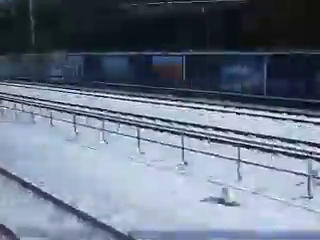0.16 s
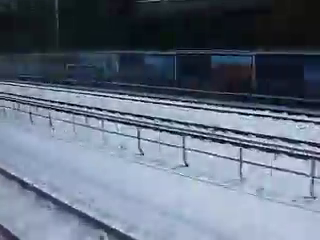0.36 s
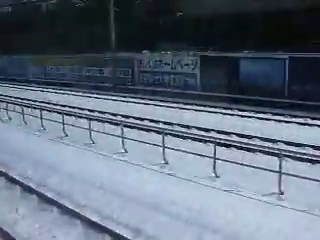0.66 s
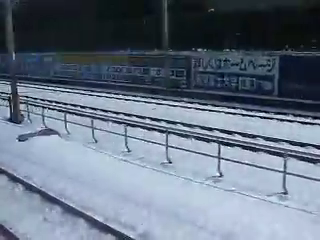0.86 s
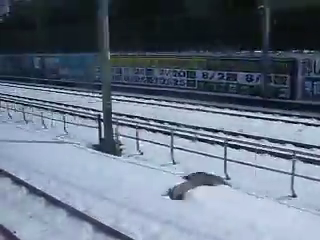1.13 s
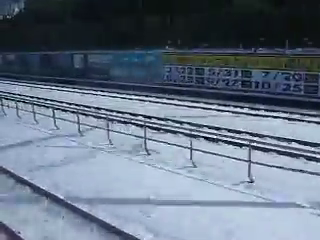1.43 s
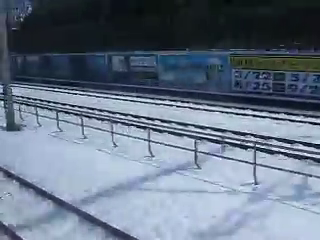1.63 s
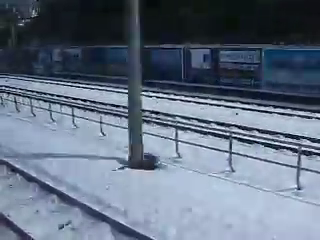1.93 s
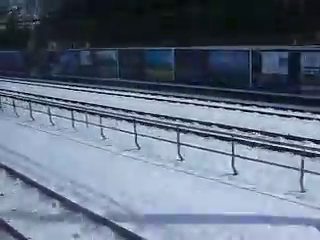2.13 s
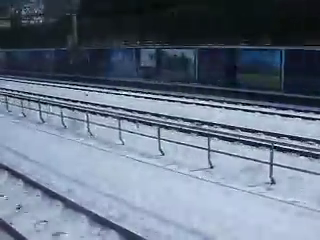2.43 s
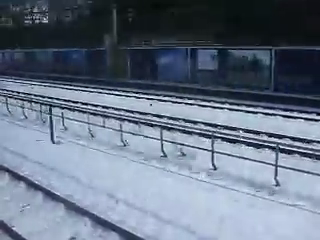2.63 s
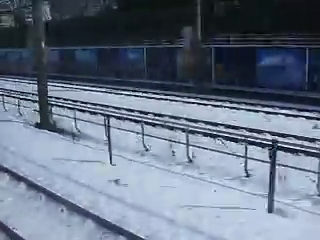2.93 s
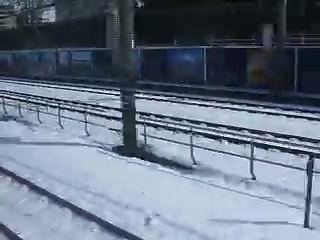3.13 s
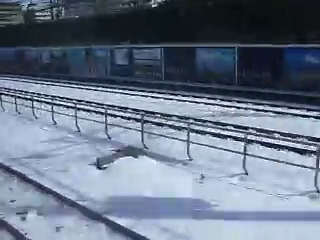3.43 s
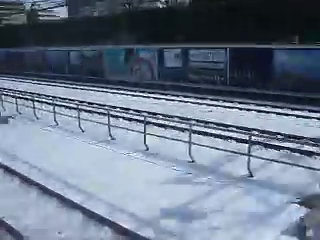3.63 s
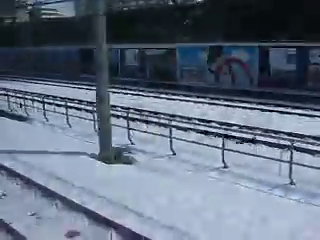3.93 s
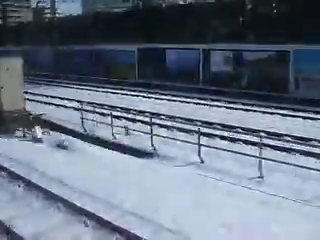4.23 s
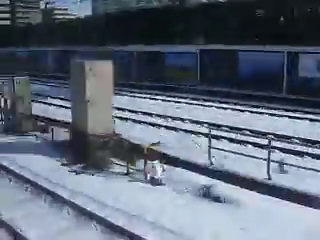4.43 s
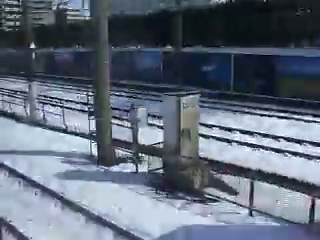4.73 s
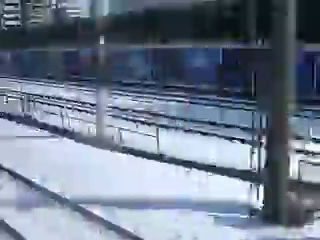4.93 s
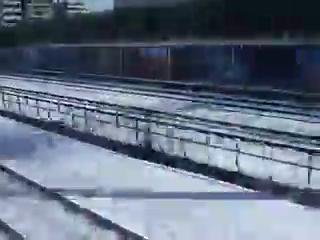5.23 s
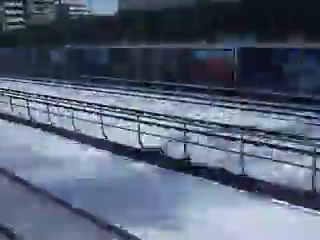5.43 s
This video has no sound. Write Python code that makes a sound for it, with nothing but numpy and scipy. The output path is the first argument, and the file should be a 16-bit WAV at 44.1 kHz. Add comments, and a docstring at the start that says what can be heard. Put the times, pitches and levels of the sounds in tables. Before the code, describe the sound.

Inside a moving electric train carriage, held motor tones hum over a muffled roar of wheels and a low floor rumble.

```python
"""Inside the carriage of an electric commuter train on open track.
The traction motor hums on multiples of its slowly rising shaft speed. The wheels roar on the rails,
the floor rumbles and the body panels drone, with extra shake over rough stretches of track.
Air hisses past the windows. A small narrow-band microphone just overloads and crackles faintly."""
import sys
import numpy as np
from scipy import signal
from scipy.fft import rfft, irfft
from scipy.io import wavfile
from scipy.ndimage import uniform_filter1d

SR = 44100
rng = np.random.default_rng(int(sys.argv[2]) if len(sys.argv) > 2 else 0)


def wrap_up_sound(samples):
    """Save the sound to the file named by the first command line argument, as 16-bit audio."""
    columns = np.atleast_2d(samples).T
    # keep every value between -1 and 1, then stretch to whole-number steps
    tamed = np.clip(columns, -1, 1)
    steps = np.round(tamed * 32767).astype(np.int16)
    wavfile.write(sys.argv[1], SR, steps)


N = 245195
TIME_S, FREQ_HZ = np.arange(N) / SR, np.fft.rfftfreq(N, 1 / SR)

# rough stretches that shake the carriage: middle_s, length_s, rumble_lift_db, drone_lift_db
ROUGH_TRACK = [(0.13, 0.15, 4, 0), (1.08, 0.18, 1.5, 2), (2.92, 0.24, 4.5, 0.5), (4.026, 0.13, 5, 4),
               (5.15, 0.62, 3.5, 4)]


def motor_hum():
    """The traction motor sings on whole multiples of its shaft speed: five loud tones over a faint bed."""
    # shaft speed: time_s, turns_per_s
    shaft_speed = [(0, 53.12), (2, 53.28), (4, 53.46), (4.4, 53.42), (5.56, 53.58)]
    # tones that sing out: multiple, resting_level_db
    loud_tones = [(4, -21.5), (7, -21.7), (11, -27.5), (19, -26), (23, -28.5)]
    # swells and dips of those tones: multiple, middle_s, length_s, lift_db
    tone_swells = [(4, 4.8, 3.2, 3), (4, 3.28, 0.16, -11), (7, 1.25, 0.16, 5.5), (7, 1.8, 0.42, 5),
                   (7, 3.15, 2.3, 7), (7, 5.22, 2.16, 5), (11, 3.0, 1.2, -5), (19, 1.85, 2.3, -9),
                   (23, 0.81, 0.9, -3), (23, 2.7, 1.9, 3.5), (23, 4.25, 0.76, -4), (23, 5.6, 0.35, 6.5)]
    # the bed of weaker tones: multiple, relative_level_db
    faint_tones = [(1, -32), (2, -43.5), (5, -27), (6, -34), (8, -27.5), (9, -41.5), (10, -35), (12, -36.5),
                   (14, -40), (15, -40.5), (16, -41.5), (17, -34), (22, -43.5), (27, -43.5), (42, -51.5)]
    turns_per_s = np.interp(TIME_S, *np.transpose(shaft_speed))
    angle = 2 * np.pi * np.cumsum(turns_per_s) / SR
    loud = faint = 0
    for multiple, level_db in loud_tones:
        lift_db = sum(db * swell(middle, length) for k, middle, length, db in tone_swells if k == multiple)
        partial = swaying_tone(multiple * angle, waver_rad=0.25, flutter_db=1.0, rate_hz=19)
        loud += gain_of(level_db + lift_db) * partial
    for multiple, level_db in faint_tones:
        partial = swaying_tone(multiple * angle, waver_rad=0.7, flutter_db=3.5, rate_hz=4)
        faint += gain_of(level_db) * partial
    return loud + gain_of(-1.5) * faint


def panel_drone():
    """Random shaking rings the resonances of the body panels, harder on rough track."""
    # panel resonances: pitch_hz, width_hz, relative_level_db
    resonances = [(246.8, 40, 1), (307, 5.7, -3.5), (318.6, 69, 2), (405, 63, -2)]
    shape = sum(gain_of(db) / (1 + ((FREQ_HZ - hz) / width) ** 2) ** 2 for hz, width, db in resonances)
    lift_db = sum(db * swell(middle, length) for middle, length, _, db in ROUGH_TRACK)
    return speed_gain(start_db=-18, db_per_s=0.13) * gain_of(lift_db) * steady(noise(shape))


def wheel_roar():
    """Wheels roll on the rails: an even roar, muffled by the carriage wall."""
    # colour of the roar: frequency_hz, relative_level_db
    colour = [(200, -34), (460, 0.5), (505, -0.5), (530, -1), (575, -2), (630, 1), (670, -3.5), (780, 2),
              (920, -2), (1020, -1.5), (1100, -7), (1230, -8.5), (1380, -18), (2000, -55.5)]
    return speed_gain(start_db=-19.5, db_per_s=0.2945) * steady(noise(spectrum(colour)))


def floor_rumble():
    """The floor shakes with a deep rumble that surges on rough track."""
    # colour of the rumble: frequency_hz, relative_level_db
    colour = [(4, -24), (12, -3), (35, -6.5), (60, -0.5), (85, 0.1), (115, -1.1), (150, -5), (195, -5),
              (260, -17.5), (500, -66.5)]
    lift_db = sum(db * swell(middle, length) for middle, length, db, _ in ROUGH_TRACK)
    return speed_gain(start_db=-21.5, db_per_s=0.5) * gain_of(lift_db) * steady(noise(spectrum(colour)))


def window_rush():
    """Rushing air and rail hiss blend into a smooth wash at the windows."""
    # colour of the rush: frequency_hz, relative_level_db
    colour = [(600, -23), (1400, 2.5), (1800, 1.5), (2000, 2), (2250, 0), (2500, 1.5), (3100, -5.5),
              (3550, -6), (3850, -8.5), (4300, -8), (5150, -13), (5780, -29), (6100, -41), (6500, -70)]
    return speed_gain(start_db=-28.5, db_per_s=0.1443) * noise(spectrum(colour))


def swaying_tone(angle, waver_rad, flutter_db, rate_hz):
    """A sine whose phase and strength waver as the carriage sways."""
    strength = np.sqrt(2) * gain_of(flutter_db * drift(rate_hz))
    phase = rng.uniform(0, 2 * np.pi) + waver_rad * drift(rate_hz)
    return strength * np.cos(angle + phase)


def speed_gain(start_db, db_per_s):
    """A gain that creeps up as the train gathers speed."""
    return gain_of(start_db + db_per_s * TIME_S)


def swell(middle_s, length_s):
    """A smooth rise from 0 to 1, a short hold, and a fall back."""
    return np.exp(-(2 * (TIME_S - middle_s) / length_s) ** 4)


def gain_of(db):
    """Decibels to amplitude."""
    return 10 ** (np.asarray(db) / 20)


def spectrum(points):
    """Gain at each frequency, from dB points joined on a log frequency axis."""
    hz, db = np.transpose(points)
    return gain_of(np.interp(np.log(FREQ_HZ + 1), np.log(hz + 1), db))


def noise(shape):
    """Noise coloured by a gain at each frequency, then scaled to rms 1."""
    coloured = irfft(rfft(rng.standard_normal(N)) * shape, N)
    return coloured / np.sqrt(np.mean(coloured ** 2) + 1e-20)


def drift(rate_hz):
    """Slow random wander of rms 1."""
    return noise(np.exp(-(FREQ_HZ / rate_hz) ** 2))


def steady(x, window_samples=7000):
    """Holds the short-term strength of a noise at 1."""
    return x / np.sqrt(uniform_filter1d(x ** 2, window_samples) + 1e-12)


def low_pass(x, hz):
    """Steep low-pass without delay."""
    taps = signal.firwin(511, hz, window=("kaiser", 9), fs=SR)
    return signal.oaconvolve(x, taps[None], "same")


def scene():
    """All that reaches one seat by the window, in mono."""
    return (motor_hum() + floor_rumble() + panel_drone() + wheel_roar() + window_rush())[None]


def record(dry):
    """A narrow-band microphone overloads; ripple on the flattened peaks clips again as faint crackle."""
    overload_limit, ripple_limit, crackle_boost_db = 0.704, 0.707, 7
    band = low_pass(np.clip(dry, -overload_limit, overload_limit), hz=6050)
    crackle = np.clip(band, -ripple_limit, ripple_limit) - band
    return low_pass(band + gain_of(crackle_boost_db) * crackle, hz=15800)


dry = scene()
out = record(dry)
wrap_up_sound(out)
```